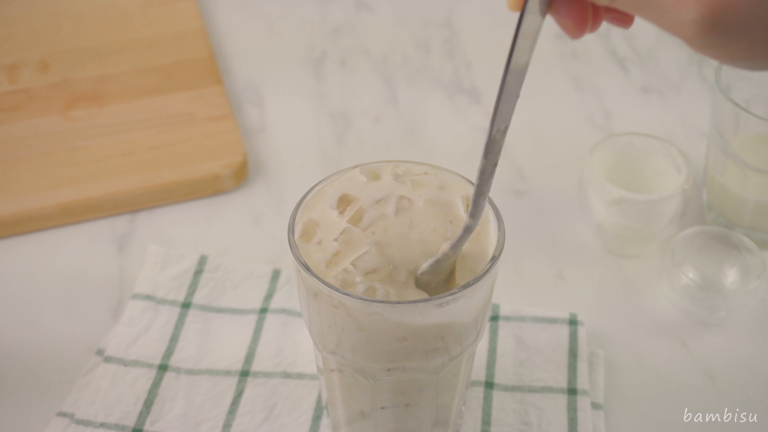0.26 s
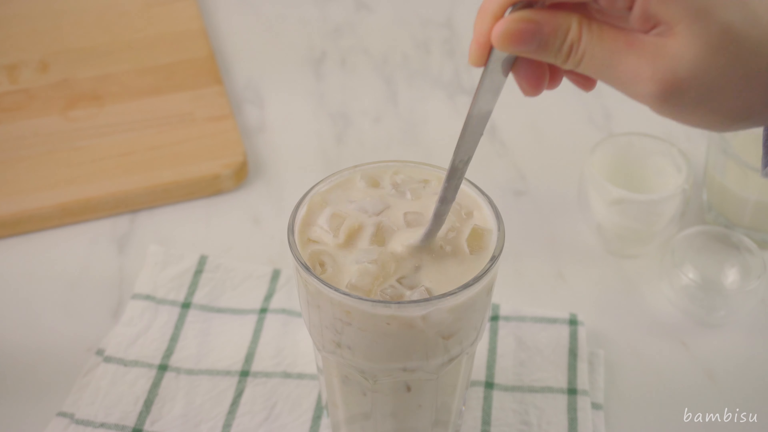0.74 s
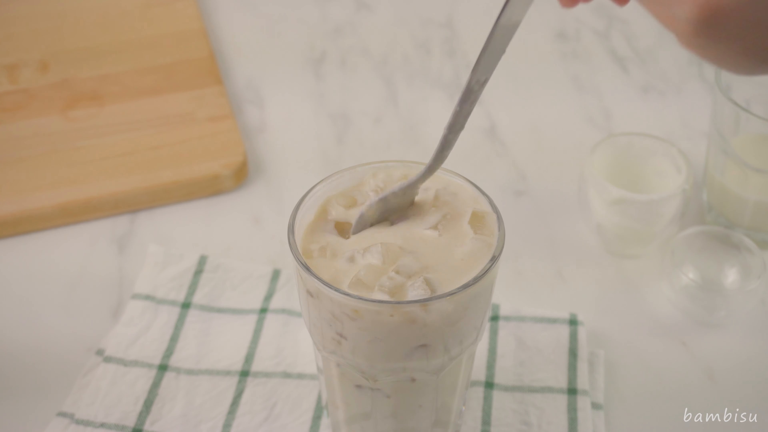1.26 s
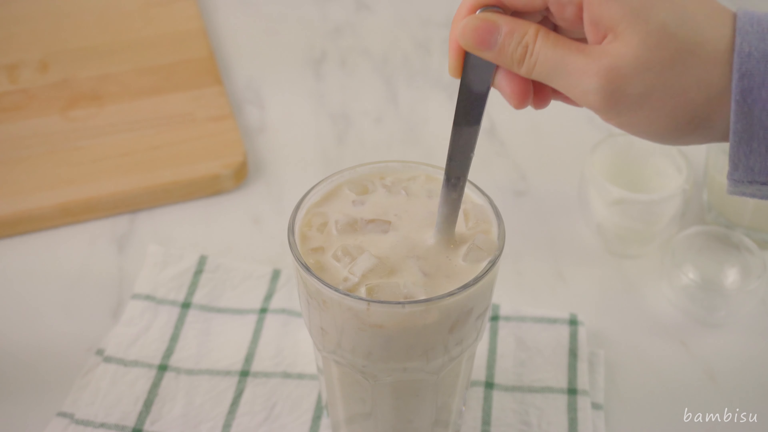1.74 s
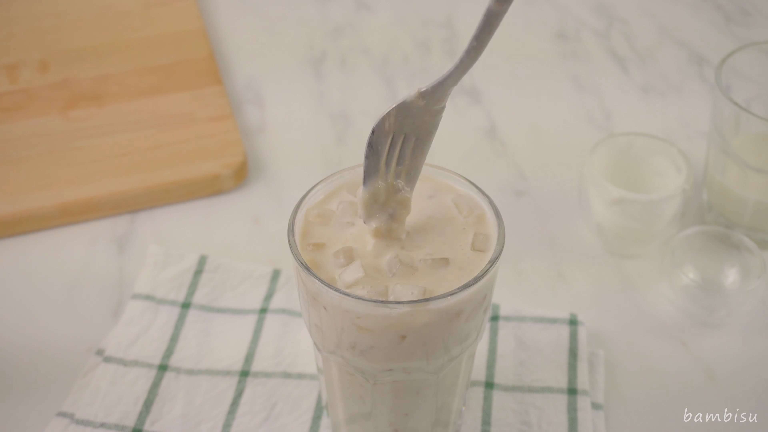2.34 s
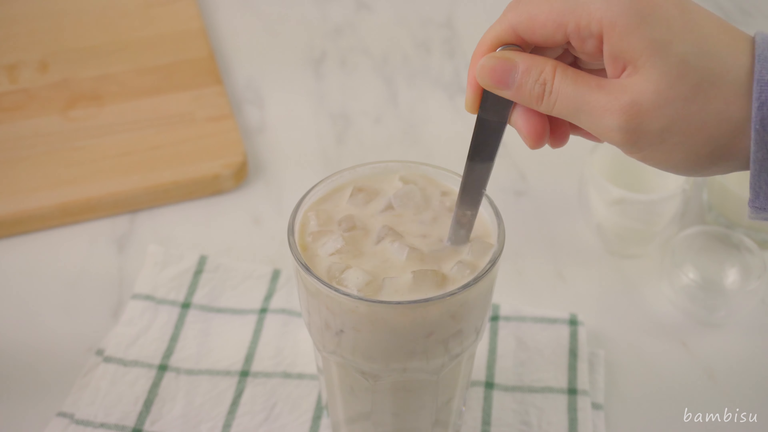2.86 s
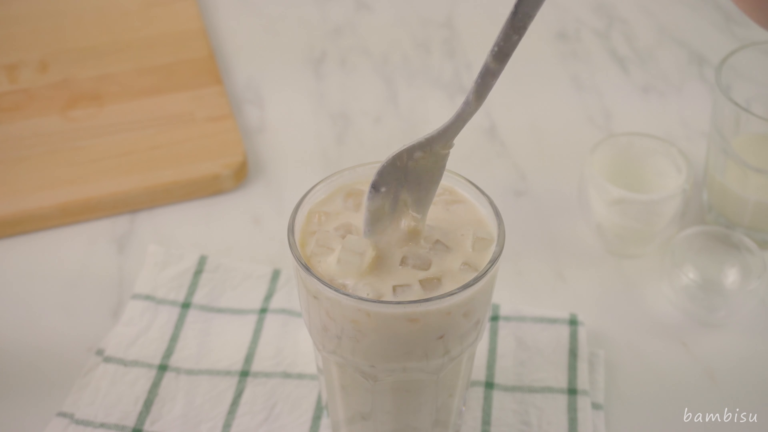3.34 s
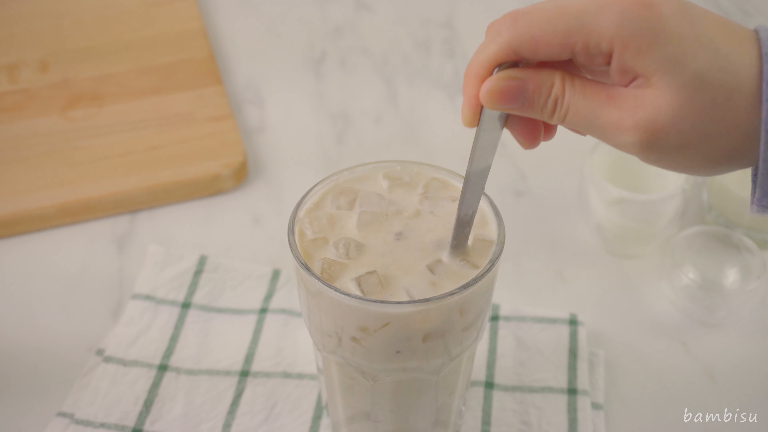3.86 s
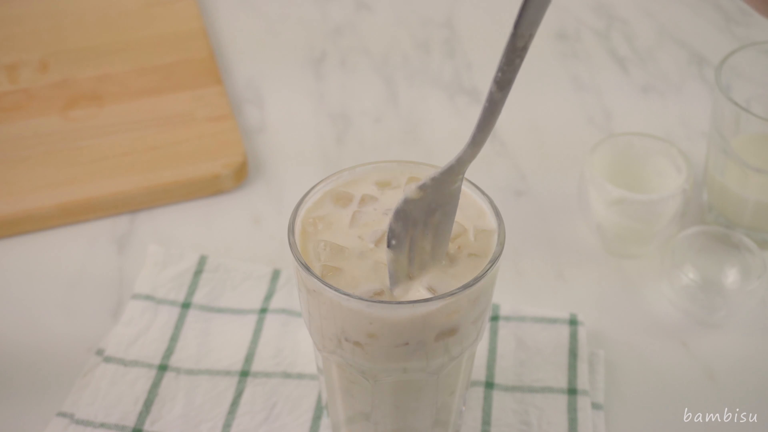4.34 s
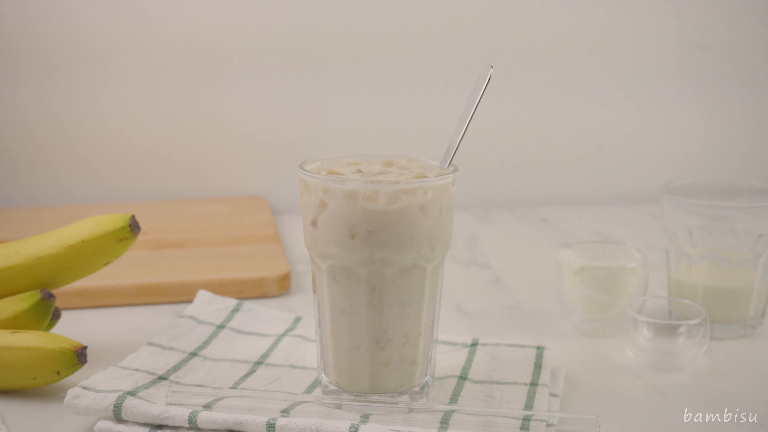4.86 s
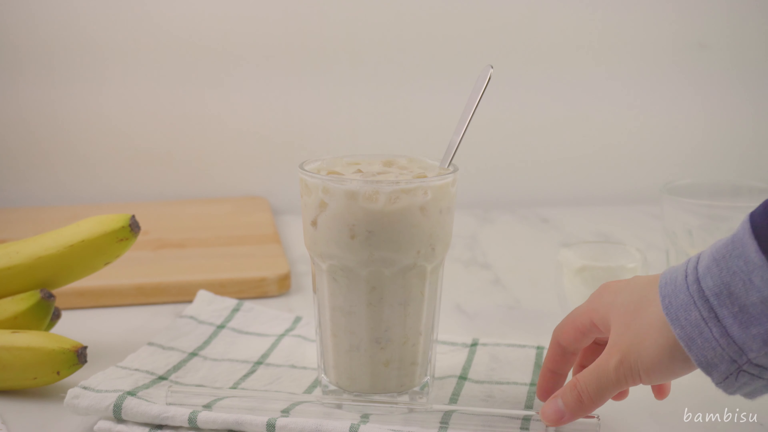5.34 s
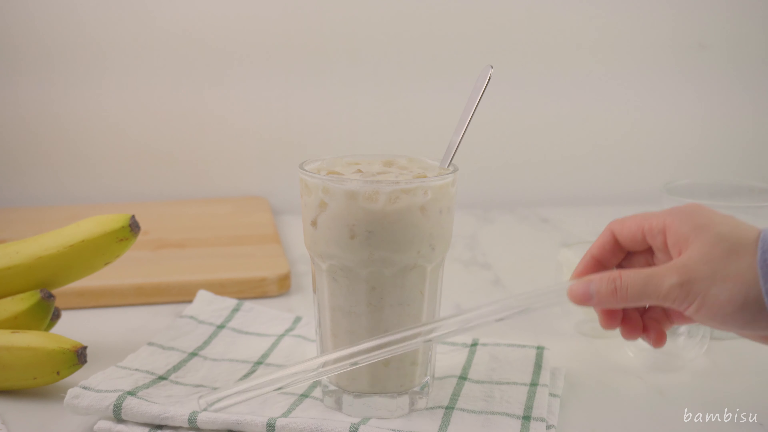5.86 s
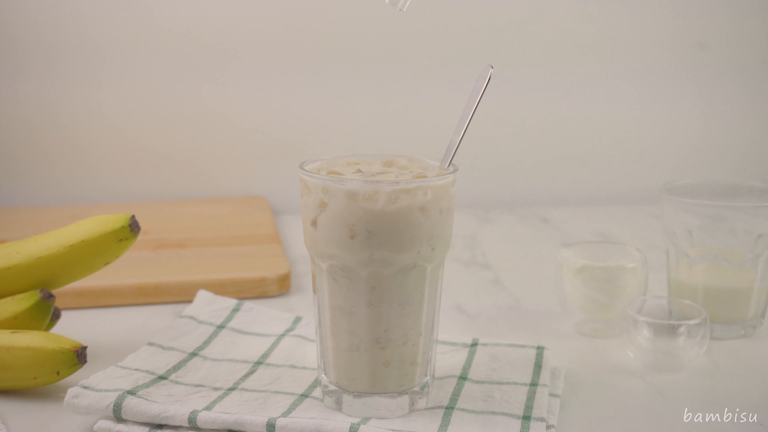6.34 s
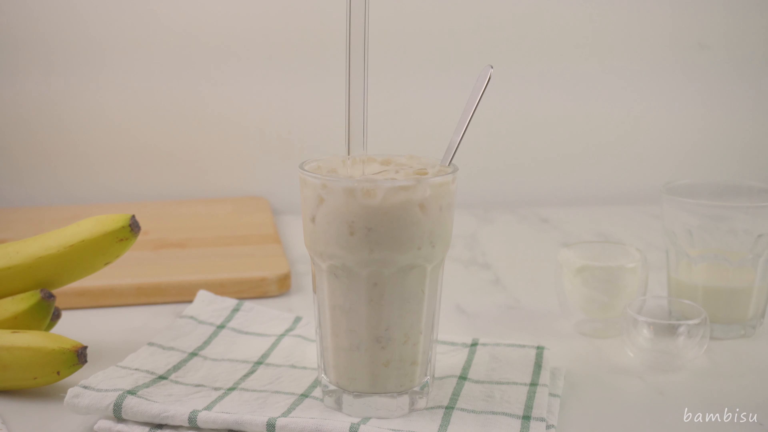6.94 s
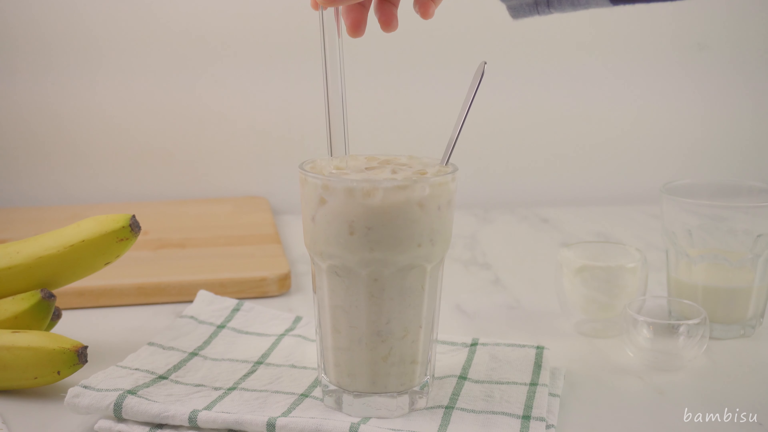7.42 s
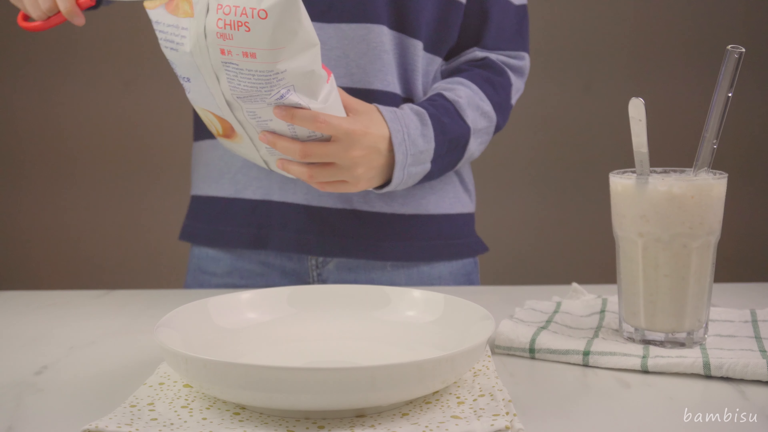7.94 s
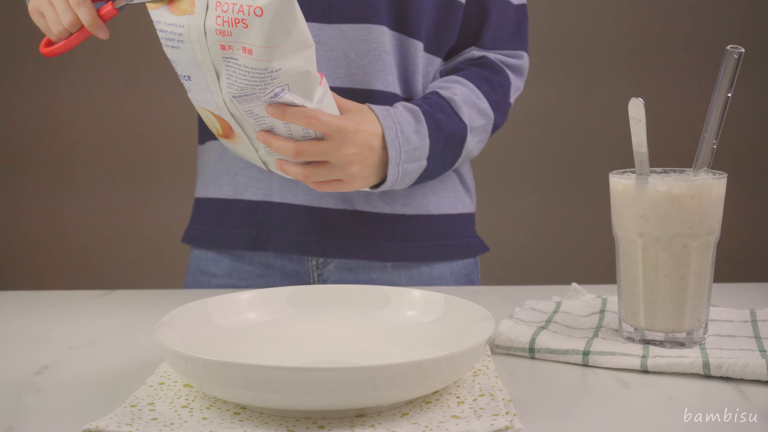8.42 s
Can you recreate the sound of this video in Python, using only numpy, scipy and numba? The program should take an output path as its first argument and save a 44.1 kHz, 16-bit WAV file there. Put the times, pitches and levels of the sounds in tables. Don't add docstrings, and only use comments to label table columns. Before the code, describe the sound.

A close microphone in a small hard-walled kitchen, with low room tone and a very faint fridge hum. From 0.1 to 0.9 s a spoon stirs ice in a full tumbler: a dense rattle of cubes, a brief lull, then more knocks. Another brisk cluster runs 1.2-1.7 s, ending in a low glassy thump, with a few clicks near 1.9. Hard knocks come at 2.5-2.7, faint ticks after 3, a bright flurry at 3.5-3.7, and lighter clinks at 4.0 and 4.4-4.7. The hum stops near 4.9 and the room tone shifts. A soft rub and tiny tap at 5.6-5.75 and a glassy slide around 6.1 precede straw clinks at 6.75 and a firmer ringing double hit at 7.1-7.25. From 7.7 a crisp plastic bag crackles, snaps and pops hollowly, with a short creak, fading by 8.4; a harder, brighter squeeze bursts at 8.5 until the end.

```python
import sys
import numpy as np
from scipy import signal
from scipy.fft import rfft, irfft
from scipy.io import wavfile
from scipy.ndimage import uniform_filter1d
from numba import njit

SR = 44100
rng = np.random.default_rng(int(sys.argv[2]) if len(sys.argv) > 2 else 0)


def to_linear_factor(level_db):
    exponent = np.asarray(level_db, float) / 20
    return 10 ** exponent


def wrap_up_sound(samples):
    columns = np.atleast_2d(samples).T
    tamed = np.clip(columns, -1, 1)
    steps = np.round(tamed * 32767).astype(np.int16)
    wavfile.write(sys.argv[1], SR, steps)


N = 382788
TIME = np.arange(N) / SR
MOVE_S = 4.87

# (full force at [s], hold [s], churn level [dB], bright part [dB], depth as dull part [dB])
SPOON_STROKES = [(0.073, 0.045, -58.5, -25, -33), (0.163, 0.35, -51, -30, -21),
                 (0.681, .16, -59.5, -25, -6.5), (0.857, 0.023, -46, -13, -15),
                 (1.24, 0.28, -43, -10, -16.5), (1.921, 0.029, -49, -9, -16), (2.559, 0.27, -46.5, -2, -12),
                 (3.09, 0.56, -76, -20.5, -20.5), (3.53, 0.16, -41.5, -1.5, -16.5),
                 (3.986, 0.023, -50.5, -8.5, -20), (4.398, 0.23, -52.5, -15, -24)]
ICE_RING_HZ = (2410, 2717, 3480, 4400)
# (time [s], level [dB], bright part [dB])
BIG_CUBES = [(0.1659, -30.5, -27), (0.6993, -28, -27), (0.74, -28.5, -32), (0.802, -28, -8),
             (0.926, -36.5, -26), (1.2224, -33.5, 8.5), (1.293, -16, 0), (1.325, -18.5, -45),
             (1.3772, -30.5, 1.5), (1.6635, -34.5, 4), (1.9582, -27.5, -15), (2.6201, -17.5, -7),
             (2.6308, -20, -3), (2.707, -10.5, 6.5), (2.912, -38.5, 10.5), (3.1757, -38, -23),
             (3.2884, -44, -21), (3.4483, -33.5, -11.5), (3.9663, -43.5, -12), (4.002, -25.5, -13.5),
             (4.529, -22, -30), (4.8409, -42, -6)]
MIDDLE_CUBES = [(0.1252, -31.5, -20), (0.1363, -33, 7), (0.2703, -25, -4), (0.2969, -19, -15),
                (0.3086, -22, 1.5), (0.3673, -25.5, -18), (0.3712, -19.5, -8), (.464, -24, -34),
                (1.4115, -28, -18), (1.6176, -25, -42), (1.977, -32, -22), (2.5743, -21, 0.5),
                (2.8174, -29.5, -6), (3.055, -37.5, -10.5), (3.0768, -40, -20.5), (3.1093, -33.5, -27),
                (3.1294, -38, -34), (3.1522, -37, -25), (3.323, -44, -31.5), (3.612, -21, -2.5),
                (3.6444, -23.5, -2.5), (3.6571, -18, -29), (3.667, -35, -6.5), (3.6888, -19.5, -9.5),
                (4.0763, -33.5, -18), (4.1468, -37.5, -27), (4.3882, -39, 17), (4.495, -29, -27)]
SMALL_CUBES = [(0.262, -25.5, -5), (.768, -32.5, -5), (.848, -14, -8), (1.0224, -42, -15),
               (1.2073, -36, -2), (1.2353, -24, 1), (1.285, -16.5, -8.5), (1.9159, -29.5, -17),
               (1.9242, -23.5, -9), (2.0724, -37, -25), (2.5327, -27, 1), (2.5645, -19, -17.5),
               (3.4054, -31.5, -10.5), (3.523, -29.5, -10.5), (3.5366, -22.5, 0), (3.5588, -24, -28),
               (3.7692, -28.5, -6.5), (4.0136, -26, -19.5), (4.0522, -23.5, -28), (4.3751, -35, -10),
               (4.409, -28.5, 4), (4.4478, -32.5, 7), (4.5071, -16.5, -25.5), (4.6246, -24, -25),
               (4.699, -30.5, -22)]
ICE_SHARDS = [(0.1887, -31, -35), (0.2047, -27, -8), (0.2515, -19.5, 6.5), (.4304, -21.5, -21),
              (0.4558, -24, -24), (1.2678, -20.5, -19), (1.424, -20, -0.5), (1.5385, -30.5, -18),
              (1.575, -31, -27), (2.4823, -35, 7), (2.5187, -27.5, -10.5), (3.509, -34, 7.5),
              (3.5791, -15.5, -12), (4.5613, -18.5, -11)]
# (time [s], level [dB], ring [Hz], bright part [dB])
CHIP_TICKS = [(.0608, -54, 3460, -25), (.0815, -51.5, 3490, -25), (.2274, -32, 2970, -16),
              (.241, -38, 2200, -25), (.286, -27.5, 2875, -14), (.2916, -18, 2370, -12),
              (.3172, -21, 2780, -12.5), (.3284, -24, 2930, -14.5), (.3483, -27, 2500, -5),
              (.415, -42, 3660, -20), (.4239, -38, 2400, -7), (.4788, -30.5, 3930, -15.5),
              (.5257, -42, 2480, -25), (.5563, -41, 2740, -18), (.6614, -53, 2180, -24.5),
              (1.2605, -27, 3400, -14), (1.3, -24, 2200, -10.5), (1.3374, -20, 2200, -18),
              (1.352, -26, 4900, 3), (1.3964, -31, 2310, -22), (1.46, -40, 4500, 6),
              (1.489, -30, 2600, -10), (1.502, -32, 2410, -20), (1.5547, -35, 3770, -12),
              (1.6053, -34, 2620, -22), (1.6308, -26, 2250, -5), (1.8247, -51.5, 2470, -30),
              (1.862, -51, 2470, -30), (1.8884, -35, 2600, -8), (2.1231, -51, 2200, -25),
              (2.2433, -48, 3250, -26), (2.6648, -30, 2173, -20.5), (2.6915, -19.5, 2400, -16),
              (2.8564, -43, 2430, -18), (2.8892, -37.5, 2380, -18), (3.0889, -41, 2660, -21),
              (3.2036, -46.5, 2540, -28.5), (3.2627, -46.5, 2500, -29), (3.3697, -46, 3450, -27),
              (3.5438, -25, 2950, -8), (3.6276, -18, 2520, -13), (3.7134, -42, 3100, -6),
              (3.7466, -38, 6600, -3), (3.8405, -40, 2010, -14), (3.8596, -42.5, 2800, -19),
              (4.4317, -29, 2820, -15.5), (4.6116, -29, 3960, -27), (4.6516, -33.5, 4000, -22.5),
              (6.963, -60, 2400, -30), (7.053, -56, 2410, -30)]

# (time [s], level [dB])
TUMBLER_ROCKS = [(0.299, -50), (.25, -56), (.37, -54), (.74, -50), (.77, -52), (.802, -57), (1.236, -52),
                 (1.324, -41.5), (2.565, -48.5), (3.536, -56.5), (3.645, -46), (4.003, -57.5), (4.5, -59),
                 (0.846, -43.5), (1.288, -40), (1.66, -27), (1.937, -54), (2.523, -46), (2.621, -31.5),
                 (2.707, -27.5), (2.91, -46.5), (3.582, -45), (3.611, -41.5), (3.688, -39), (4.541, -56.5)]
# (time [s], level [dB], ring [Hz])
TUMBLER_JOLTS = [
    (6.743, -34, 329),
    (6.787, -45, 310),
    (7.121, -22, 380),
    (7.193, -12.5, 327.5),
    (7.222, -27.5, 372),
    (7.245, -23.5, 338),
]
# time [s], ring [Hz], t60 [s], level [dB]
CUBE_PLOP = (1.662, 420, .035, -23)
# (time [s], level [dB], frequency [Hz])
COUNTER_SHOVES = [(0.309, -39, 30), (1.268, -47.5, 96), (1.29, -40.5, 21), (1.668, -39.5, 43),
                  (2.719, -43, 65), (3.63, -32, 37.6), (4.418, -52.5, 56), (4.953, -47, 122),
                  (5.12, -35, 15.5), (5.791, -52.5, 207), (6.76, -45.5, 66), (7.13, -40, 78),
                  (7.198, -25.5, 67), (7.241, -39, 200), (8.59, -46.5, 146)]

STRAW_MODE_HZ = (1206, 1637, 2003, 3290, 3375, 3447, 4330, 6368, 6428, 6519, 10200, 14630)
# (level [dB], t60 [s])
STRAW_MODES = [(-16, 0.12), (-0.5, .05), (-11, .08), (-3, .08), (2, .12), (1, 0.087), (-10.5, .08),
               (-3, 0.063), (-6, 0.17), (-5, 0.11), (-9, 0.068), (-20.5, .11)]
# (time [s], level [dB])
STRAW_HITS = [
    (5.75, -70),
    (6.743, -27.5),
    (6.757, -33.5),
    (6.788, -38.5),
]
# (time [s], level [dB])
STRAW_SLIDE = [
    (5.6, -98.5),
    (5.63, -75.5),
    (5.66, -74.5),
    (5.7, -99),
    (5.9, -100),
    (6.0, -81),
    (6.1, -70.5),
    (6.14, -110),
]
# (time [s], level [dB], ring [Hz], bright part [dB], dull part [dB])
STRAW_DROP = [(5.7474, -46, 2156, -15.5, -17), (6.7417, -8.5, 3300, -16.5, -33),
              (6.758, -19, 3340, 4, -16.5), (6.7863, -17.5, 3320, -22, -19.5),
              (7.1196, -13, 2896, 0, -14.5), (7.1523, -32.5, 4700, 13, 0), (7.192, -12.5, 2720, 3, -10),
              (7.2204, -21, 3120, 6.5, -6), (7.2308, -24.5, 2630, -22, -5), (7.32, -38, 3340, 3, -10),
              (7.3664, -46, 3550, -17, -4), (7.4813, -49.5, 3120, -8, -47.5)]
# (frequency [Hz], level [dB], t60 [s])
WALL_MODES = [(1240, -2, 0.096), (2505, -2, 0.071), (3004, -4.5, 0.051), (3900, -6.5, 0.073),
              (5700, -9, .08)]
# (time [s], level [dB])
WALL_HITS = [
    (7.121, -30),
    (7.193, -32.5),
    (7.229, -36),
    (7.365, -60.5),
    (7.391, -63),
]

# (time [s], level [dB], ring [Hz], bright part [dB])
FOLD_SNAPS = [(7.7395, -12.5, 1620, -5.5), (7.7576, -19.5, 1400, -9), (7.857, -18, 1740.0, -22),
              (7.9019, -10, 4040, -9), (7.9075, -18, 1960, 2.5), (7.9198, -16, 3480, -5),
              (7.9418, -19.5, 2070, 6.5), (8.0527, -16.5, 2080, -1), (8.0724, -21, 1160, 1),
              (8.105, -6, 2100, -7), (8.1773, -18.5, 1800, 4), (8.2027, -14, 3250, -24),
              (8.4707, -18.5, 2460, -29), (8.4875, -10, 3160, -25), (8.5036, -3, 5300, 1),
              (8.5123, -8.5, 4800, 10.5), (8.5687, -7.5, 3406, -1.5), (8.5943, -10.5, 4400, -20),
              (8.6032, -13, 4600, 11)]
# (time [s], force level [dB], trapped air [dB])
BAG_SQUEEZES = [
    [(7.7, -63, 15.5), (7.76, -39.5, -6), (7.92, -39.5, 3.5), (8.0, -31.5, -5), (8.08, -39, 5),
     (8.2, -41.5, -5), (8.36, -45.5, -17), (8.45, -60.5, 6)],
    [(8.495, -45.5, 9), (8.52, -26, 0.5), (8.57, -24.5, -10), (8.62, -29.5, -26), (8.645, -39.5, -6.5),
     (8.68, -43.5, -10)],
]
# (time [s], level [dB], ring [Hz])
PANEL_POPS = [(7.6929, -47.5, 870), (7.7105, -24.5, 866), (7.7395, -25.5, 667), (7.7568, -25.5, 560),
              (7.8483, -19, 510), (7.8882, -22.5, 640), (7.9071, -17, 655), (7.9541, -25, 580),
              (7.976, -20.5, 403), (7.9942, -18.5, 389), (8.0467, -11.5, 545), (8.0714, -29, 413),
              (8.1037, -28, 474), (8.1799, -30, 530), (8.2609, -34, 636), (8.4866, -25, 618),
              (8.375, -42, 432), (8.39, -38.5, 656), (8.052, -18.5, 830), (8.5261, -17, 786),
              (8.5688, -19.5, 552), (8.5975, -16, 527), (8.6133, -29, 474)]
# (time [s], level [dB], ring [Hz], bright part [dB])
FURTHER_FOLD_SNAPS = [(7.7128, -36, 1570, -12), (7.8492, -17.5, 1830, -12), (7.8694, -29, 2210, -10),
                      (7.8865, -16, 1990, -12), (7.9409, -19, 2080, -11.5), (7.9637, -13, 2270, -10),
                      (8.0454, -17, 2170, -14), (8.0712, -21, 2030, -12), (8.1194, -24.5, 1920, -10.5),
                      (8.1544, -15.5, 1600, -12), (8.2117, -23.5, 1830, -9), (8.2644, -31, 1200, -10),
                      (8.5214, -14.5, 1460, -10), (8.6168, -11, 1550, -10)]
# (time [s], pitch [Hz], level [dB])
FILM_CREAKS = [
    [(7.955, 499.3, -38), (7.987, 407.9, -32.5), (8.001, 392.3, -22), (8.015, 346.4, -35),
     (8.031, 325, -31), (8.04, 319, -47)],
    [(8.515, 410, -40), (8.528, 429.6, -15.5), (8.542, 461, -27), (8.565, 499.3, -14.5),
     (8.59, 508.6, -30.5), (8.615, 495, -25.5), (8.628, 470, -49)],
]
CREAK_HARMONICS_DB = (-0.5, -14, -11.5, -22.5)

# (centre [Hz], t60 [s], level [dB])
ROOM_BANDS = [(394, 0.25, -16), (1620, 0.22, -17.5), (5250, 0.22, -12), (10700, 0.099, -20.5)]
# (frequency [Hz], level [dB per Hz])
FIRST_AIR = [(15, -1), (190, -10), (294, -15.5), (361, -11), (442, -22.5), (1130, -29), (16000, -61)]
SECOND_AIR = [(15, -1.5), (86, -13), (130, -14), (325, -23.5), (575, -31), (2080, -41), (16000, -52.5)]
AIR_LEVELS_DB = (-67, -62)
# (frequency [Hz], rms level [dB])
FRIDGE_LINES = [(177.6, -77), (355.5, -84.5)]


@njit
def add(out, at, hz, t60, size, phase, rise):
    for k in range(len(at)):
        z = size[k] * np.exp(1j * phase[k])
        turn = np.exp(2j * np.pi * hz[k] / SR - np.log(1000.) / (t60[k] * SR))
        lack, shrink = 1., np.exp(-hz[k] / (rise[k] * SR))
        start = int(at[k] * SR)
        for i in range(start, min(len(out), start + int(t60[k] * SR))):
            lack = lack * shrink + 1e-18
            out[i] += z.imag * (1 - lack) ** 2
            z *= turn


def rings(at, hz, t60, db, phase=0., rise=.3):
    out = np.zeros(N)
    hz = np.clip(hz, 5, .4 * SR)
    settings = np.broadcast_arrays(at, hz, t60, to_linear_factor(db), phase, rise)
    add(out, *(np.ravel(a).astype(float) for a in settings))
    return out


def knocks(table, dull_db, cycles, rattle_s, side_db, count=10):
    s, db, hz, bright_db = (c[:, None] for c in np.transpose(table)[:4])
    soft = 0.1 * to_linear_factor(-.45 * bright_db)
    own_ring = rings(s, hz, 2.3 * cycles / hz, db - 5.5, rise=2 * soft)
    crack = rings(s, hz, 3.3 / hz, db + 5.5, rise=soft)
    out = own_ring + crack
    dull = (950, 1550, np.reshape(dull_db, (-1, 1)), 0, 1.05)
    side = (np.maximum(.6 * hz, 1900), 1.9 * hz, side_db, 3.0, .9)
    bright = (6000, 15500, bright_db, 15, .7)
    for lo_hz, hi_hz, part_db, fall_db, last in (dull, side, bright):
        u = rng.random((len(s), 4, count)).transpose(1, 0, 2)
        place = (np.arange(count) + u[0]) / count
        mode_hz = lo_hz * (hi_hz / lo_hz) ** place
        t60 = 1.134 * last * cycles * (0.54 + u[2]) / np.sqrt(mode_hz * 3000)
        at = s + last * rattle_s * u[1] ** 3
        mode_db = db + part_db - 4.0 - fall_db * place
        out += rings(at, mode_hz, t60, mode_db, 3.3 * u[3], rise=0.2 + soft)
    return out


def grains(level_db, span, rate, lo_hz, hi_hz, cycles, spread_db):
    u = rng.random((int(rate * (span[1] - span[0])), 4)).T
    at = span[0] + u[0] * (span[1] - span[0])
    hz = lo_hz * (hi_hz / lo_hz) ** u[1]
    db = level_db(at) - spread_db * np.log(np.maximum(u[2], 1 / 40))
    return rings(at, hz, cycles / hz, db, 2 * np.pi * u[3], rise=1.05)


def curve(rows, column, t):
    s, value = np.transpose(rows)[[0, column]]
    return np.interp(t, s, value, left=-200, right=-200)


def coloured(points):
    hz, db = np.transpose(points)
    f = np.maximum(np.fft.rfftfreq(N, 1 / SR), 1)
    gain = (f > 12) * to_linear_factor(np.interp(np.log(f), np.log(hz), db))
    x = irfft(rfft(rng.standard_normal(N)) * gain, N)
    return x / x.std()


def cut(x, hz, kind, order=4):
    return signal.sosfilt(signal.butter(order, hz, kind, fs=SR, output="sos"), x)


def stroke(t):
    push, sag, settle, idle_db = 700, 21, 156, -80.5
    s, hold, db, bright_db, dull_db = np.transpose(SPOON_STROKES)[:, :, None]
    late = t - s
    db = db + push * np.minimum(late, 0)
    db = db - sag * np.clip(late, 0, hold)
    db = db - settle * np.maximum(late - hold, 0)
    k = db.argmax(axis=0)
    return np.maximum(db.max(axis=0), idle_db), bright_db[k, 0], dull_db[k, 0]


def ice():
    def middle_db(t):
        return stroke(t)[0] + 1.5

    def bright_db(t):
        churn_db, part_db, _ = stroke(t)
        return churn_db + part_db - 3

    def dull_db(t):
        churn_db, _, depth_db = stroke(t)
        return churn_db + 0.78 * depth_db + 3

    span = (0, MOVE_S)
    churn = grains(middle_db, span, 1300, 1700, 5500, cycles=15, spread_db=4.0)
    churn += grains(bright_db, span, 2000, 5800, 11000, cycles=4.4, spread_db=7.5)
    churn += grains(dull_db, span, 500, 1000, 1500, cycles=8.9, spread_db=6.0)
    sizes = (BIG_CUBES, MIDDLE_CUBES, SMALL_CUBES, ICE_SHARDS)
    rows = np.array([(s, db, hz, b) for size, hz in zip(sizes, ICE_RING_HZ) for s, db, b in size])
    rows[:, 2] *= 1 + .07 * rng.standard_normal(len(rows))
    full_db = stroke(rows[:, 0])[2] + .15 * (rows[:, 1] + 25)
    cubes = knocks(rows, full_db, cycles=18.1, rattle_s=.007, side_db=-6.5, count=14)
    return cut(cubes + churn, 1100, "high")


def chips():
    ticks = knocks(CHIP_TICKS, -15.5, cycles=29, rattle_s=0.0024, side_db=-8, count=8)
    return cut(to_linear_factor(-5.5) * ticks, 1150, "high")


def tumbler():
    rocks = [(*row, 301, 7.5) for row in TUMBLER_ROCKS]
    jolts = [(*row, 14) for row in TUMBLER_JOLTS]
    s, db, hz, beat_hz = np.transpose(rocks + jolts)
    pair_hz = hz + beat_hz * np.array([[-.5], [.5]])
    ring = rings(s, pair_hz, 1.7 / beat_hz, db - 0.5, rise=0.54)
    knock = rings(s, 1.25 * hz, 0.04, db + 0.5) + rings(s, 2.15 * hz, 0.11, db - 15)
    plop = rings(*CUBE_PLOP)
    return cut(cut(ring + knock + plop, 910, "low"), 330, "high")


def counter():
    s, db, hz = np.transpose(COUNTER_SHOVES)
    shove = rings(s - 0.39 / hz, hz, 0.17 + 2.7 / hz, db + 7.5, rise=0.91)
    shove += rings(s, 2 * hz, 0.09, db - 3.5, rise=0.7)
    return cut(shove, 260, "low", order=2)


def straw():
    hz, (mode_db, t60) = np.array(STRAW_MODE_HZ), np.transpose(STRAW_MODES)
    s, db = np.transpose(STRAW_HITS)[:, :, None]
    blows = rings(s, hz, t60, db + mode_db)

    def rub_db(t):
        return curve(STRAW_SLIDE, 1, t)

    at = rng.uniform(5.6, 6.14, (60, 1))
    tilt_db = 6.5 * np.log2(hz / 6400)
    rub = rings(at, hz, t60, (rub_db(at[:, 0]) - 6.0)[:, None] + 0.37 * mode_db + tilt_db)
    span = (5.55, 5.75)
    cloth = grains(lambda t: rub_db(t) + 0.5, span, 8600, 8700, 7700, cycles=43, spread_db=5.0)
    cloth += grains(lambda t: rub_db(t) + 8.5, span, 2000, 1630, 5000, cycles=8.2, spread_db=6.5)
    dull_db = 1.23 * np.transpose(STRAW_DROP)[4]
    cubes = knocks(STRAW_DROP, dull_db, cycles=19.6, rattle_s=0.0088, side_db=-2.5, count=18)
    thud = rings(5.66, np.array([400, 725]), 0.082, np.array([-50, -54]))
    scuff = grains(lambda t: -72 + 0 * t, (5.48, 5.76), 270, 556, 675, cycles=26.5, spread_db=3.5)
    return cut(blows + rub + cloth + cubes, 550, "high") + thud + scuff


def wall():
    hz, mode_db, t60 = np.transpose(WALL_MODES)
    s, db = np.transpose(WALL_HITS)[:, :, None]
    return rings(s, hz, t60, db + mode_db)


def bag():
    squeezes = BAG_SQUEEZES[0] + BAG_SQUEEZES[1]

    def force_db(t):
        return curve(squeezes, 1, t)

    def air_db(t):
        return curve(squeezes, 2, t)

    def crisp_db(t):
        return force_db(t) - 14 + 14 * (t - 7.7) + 4.5

    span = (7.6, 8.7)
    rustle = grains(lambda t: force_db(t) + 0.58, span, 3000, 669, 5840, cycles=15.5, spread_db=4.5)
    rustle += grains(lambda t: force_db(t) + 0.43 * air_db(t), (7.6, 8.15), 500, 1850, 2170,
                     cycles=22, spread_db=3.5)
    bright = grains(crisp_db, span, 4000, 4180, 14000, cycles=32.6, spread_db=1.5)
    body = grains(lambda t: force_db(t) + air_db(t) + 3.5, span, 1000, 354.5, 958, cycles=16.7, spread_db=1.0)
    sag = grains(lambda t: force_db(t) + 1.5, (7.6, 8.46), 400, 180, 293, cycles=5.3, spread_db=5.5)
    s, db, hz = np.transpose(PANEL_POPS)
    boom = rings(s, hz, 22 / hz, db + 2, rise=0.24)
    boom += rings(s + 0.00414, 1.526 * hz, 16 / hz, db - 10.5)
    snaps = knocks(FOLD_SNAPS, -11.5, cycles=12.2, rattle_s=0.0044, side_db=-3.0, count=12)
    film = cut(snaps + rustle + bright, 1300, "high", order=2)
    enclosed_air = cut(cut(boom + body, 1160, "low", order=2), 230, "high")
    return film + enclosed_air + cut(sag, 162, "high")


def further_snaps():
    ticks = knocks(FURTHER_FOLD_SNAPS, -19, cycles=11, rattle_s=0.0042, side_db=-4, count=10)
    return cut(to_linear_factor(-9.5) * ticks, 900, "high", order=2)


def creak():
    out = 0
    for rows in FILM_CREAKS:
        steps = np.repeat(rng.standard_normal((2, N // 150 + 1)), 150, axis=1)[:, :N]
        pitch_flutter, level_flutter = uniform_filter1d(steps, size=150)
        s, hz = np.transpose(rows)[:2]
        pitch_hz = np.interp(TIME, s, hz) * (1 + 0.0302 * pitch_flutter)
        phase = 2 * np.pi * np.cumsum(pitch_hz) / SR
        size = uniform_filter1d(to_linear_factor(curve(rows, 2, TIME) + 3 + 2.8 * level_flutter), size=200)
        out = out + size * sum(to_linear_factor(db) * np.sin((k + 1) * phase) for k, db in enumerate(CREAK_HARMONICS_DB))
    return out


def room(x):
    t = np.arange(SR // 2) / SR
    tail = 0
    for hz, t60, db in ROOM_BANDS:
        band = cut(rng.standard_normal(len(t)), [hz * .55, hz * 1.8], "band", order=2)
        band = band * to_linear_factor(-60 * t / t60) * np.clip(t / .004, 0, 1)
        tail = tail + to_linear_factor(db) * band / np.sqrt(np.sum(band ** 2))
    return x + signal.fftconvolve(x, tail)[:N]


def kitchen():
    first = np.clip((MOVE_S - TIME) / 0.0194, 0, 1)
    steps = np.repeat(rng.standard_normal(N // 4000 + 1), 4000)[:N]
    waver_db = 1.8 * uniform_filter1d(steps, size=4000)
    hum = 0
    for hz, db in FRIDGE_LINES:
        hum = hum + np.sqrt(2) * to_linear_factor(db + waver_db) * np.sin(2 * np.pi * hz * TIME)
    whirr = grains(lambda t: -83 + 0 * t, (4.9, 5.55), 300, 1140, 1170, cycles=52, spread_db=3.5)
    first_tone = to_linear_factor(AIR_LEVELS_DB[0]) * coloured(FIRST_AIR) + hum
    second_tone = to_linear_factor(AIR_LEVELS_DB[1]) * coloured(SECOND_AIR)
    return whirr + first * first_tone + (1 - first) * second_tone


def scene():
    ring = tumbler()
    near = ice() + chips() + straw() + wall() + bag() + further_snaps() + creak()
    mix = room(near + to_linear_factor(-15) * ring) + 0.89 * ring + counter() + kitchen()
    return mix[None]


def roll_off(x):
    return signal.sosfilt(signal.butter(12, 16850, fs=SR, output="sos"), x)


def record(dry):
    soft = np.tanh(1.2 * dry) / 1.2
    return roll_off(cut(soft, 15700, "low", order=8))


dry = scene()
out = record(dry)
wrap_up_sound(out)
```